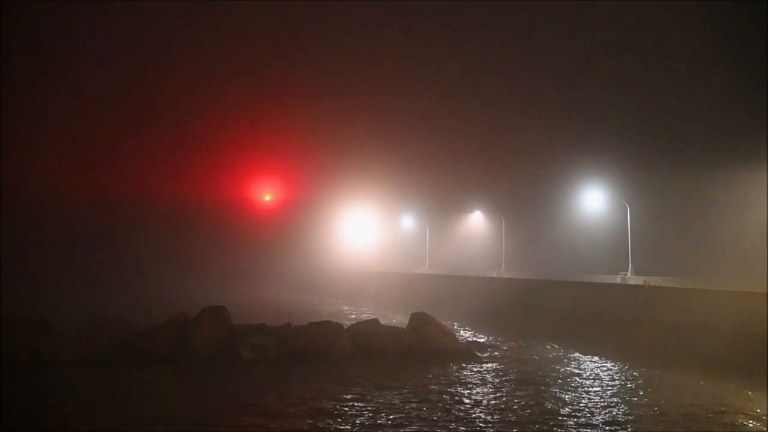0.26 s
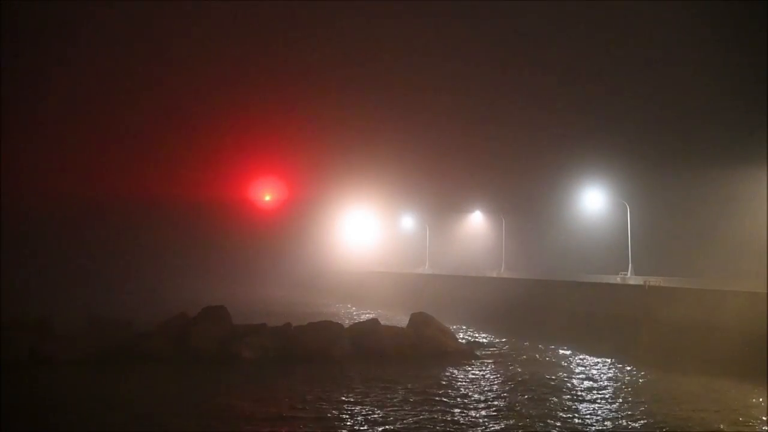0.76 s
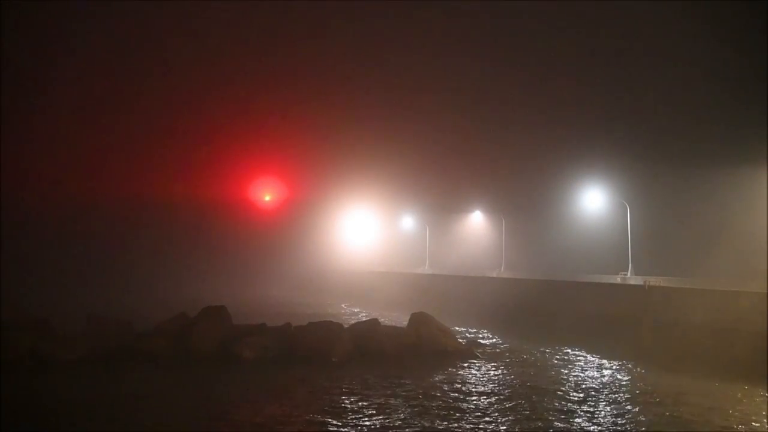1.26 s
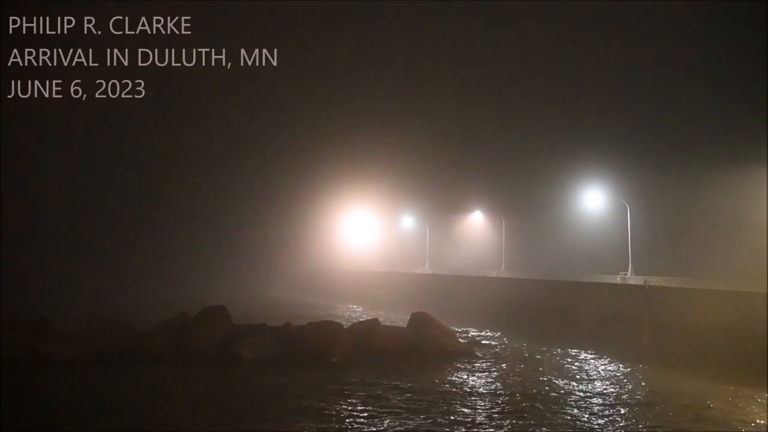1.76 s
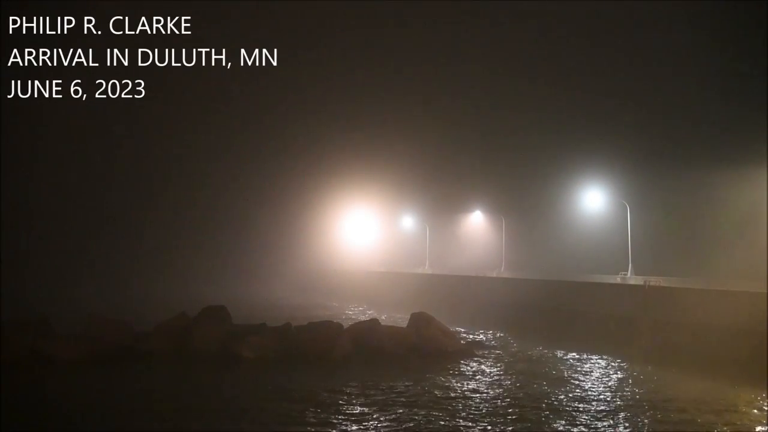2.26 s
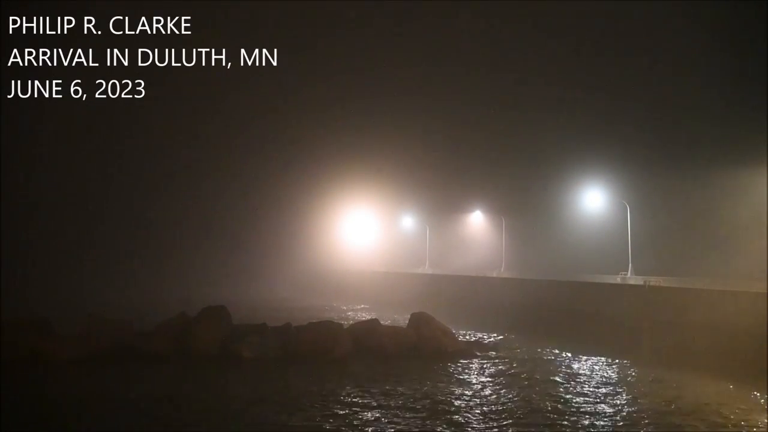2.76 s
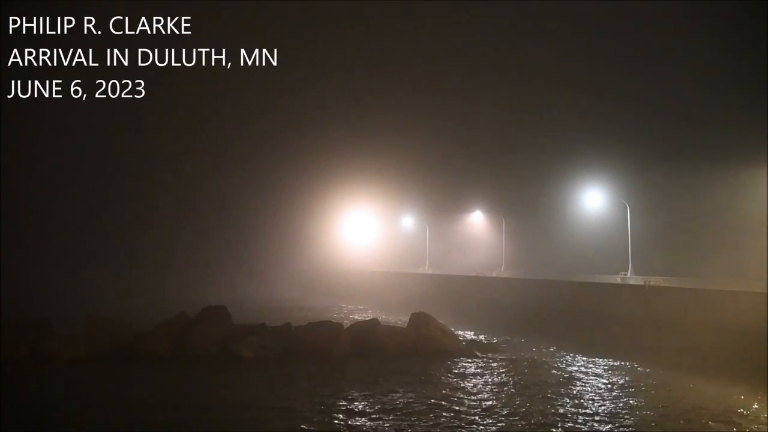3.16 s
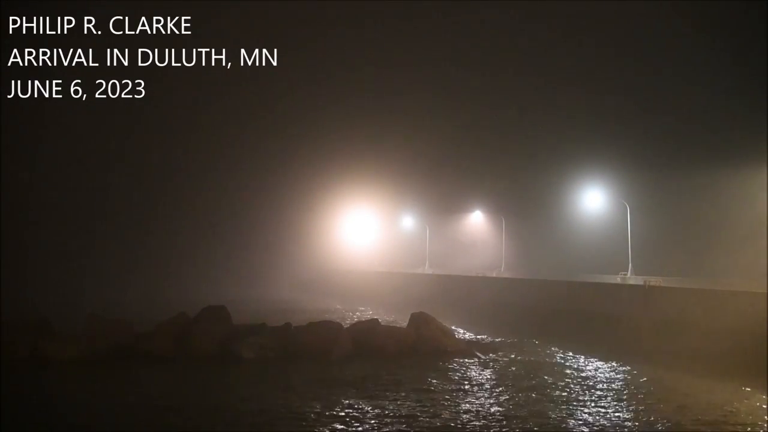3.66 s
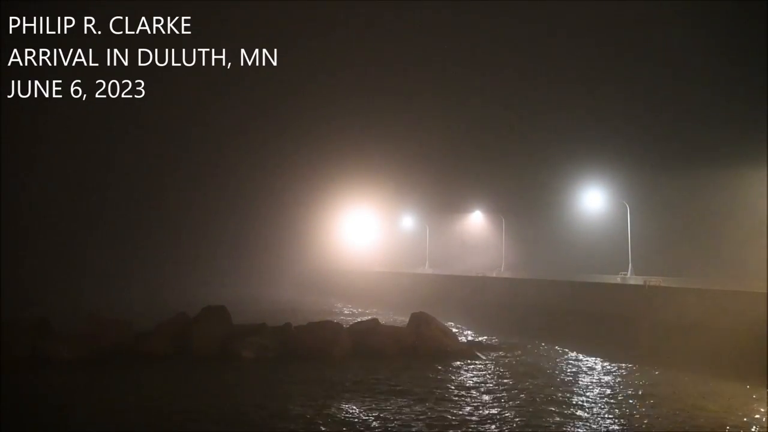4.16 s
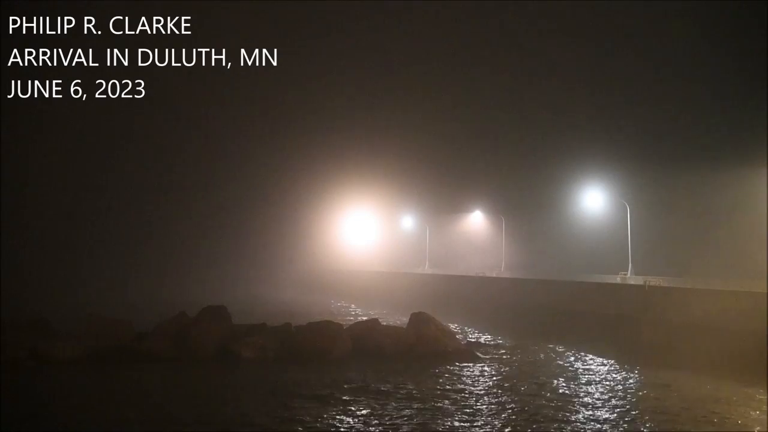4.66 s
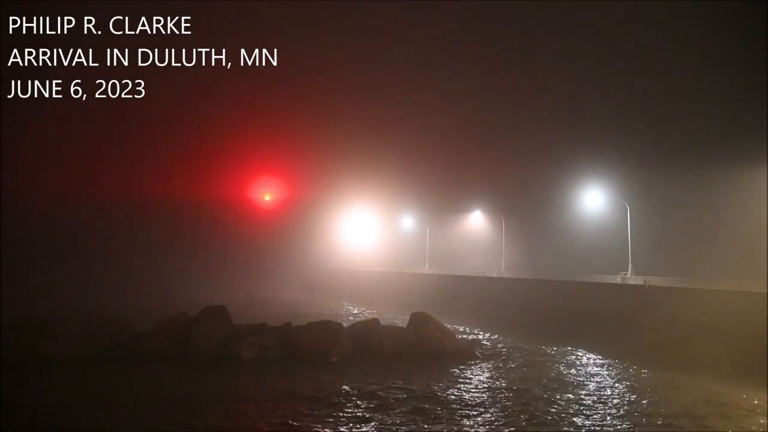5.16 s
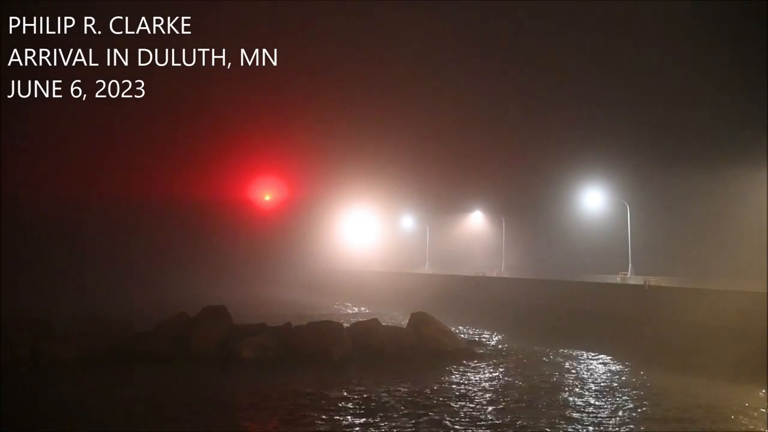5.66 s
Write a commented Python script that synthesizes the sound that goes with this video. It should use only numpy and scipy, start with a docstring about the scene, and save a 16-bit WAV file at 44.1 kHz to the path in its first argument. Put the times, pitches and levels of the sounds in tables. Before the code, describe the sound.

Quiet water laps, gurgles and fizzes over rocks, slowly swelling, until a loud low ship's horn bursts in near the end and holds.

```python
"""At a harbour wall in fog, water washes over a rock jetty and a large ship sounds a low air horn.
Filtered noise gives the surge, the wash and the hiss of foam and spray; decaying sine bubbles give
gurgles, ticks, drops and the repeated slaps on stone. The water swells, and near 5 s the horn
enters over it: a sum of harmonics with the phases of a ringing bell, each wavering, with faint
scatter behind. The horn lasts to the end."""
import sys
import numpy as np
from scipy import signal
from scipy.fft import rfft, irfft, next_fast_len
from scipy.io import wavfile
from scipy.ndimage import uniform_filter1d

SR = 44100
rng = np.random.default_rng(int(sys.argv[2]) if len(sys.argv) > 2 else 0)


def persist_wave(psi):
    """Save psi, clipped to +-1, as 16-bit WAV."""
    counts = np.round(np.clip(psi, -1, 1) * 32767).astype(np.int16)
    wavfile.write(sys.argv[1], SR, np.atleast_2d(counts).T)


N = 261072
TIME = np.arange(N) / SR  # s

# Low surge of the swell: time_s, level_db
SURGE_LEVEL = [(0.0, -73), (1.48, -67), (1.59, -65), (1.66, -69), (3.19, -64), (3.26, -60.5), (3.41, -62),
               (4.94, -57), (5.0, -59)]
# Water running over the rocks, before trim and lapping: time_s, level_db
WASH_LEVEL = [(0.0, -67), (0.15, -63), (0.42, -59.5), (1.25, -61.5), (1.48, -57.5), (1.67, -61.5),
              (1.89, -62), (3.05, -58), (3.52, -55.5), (4.68, -52.5), (5.0, -49.5), (5.9, -48.5)]
# Fizz of the foam, before each layer's trim: time_s, level_db
FOAM_LEVEL = [(0.0, -76.5), (0.36, -72), (0.76, -78), (1.45, -73.5), (1.6, -69.5), (1.73, -75),
              (1.89, -77.5), (2.82, -74), (3.56, -64), (4.42, -67), (4.88, -65.5), (5.61, -65), (5.79, -68),
              (5.92, -69.5)]
# Relative spectral densities of the four noise layers: frequency_hz, density_db (per Hz)
SURGE_SPECTRUM = [(10, -17), (25, -8), (45, -5), (65, -3), (100, -0.5), (125, -1.5), (152, 3.5), (185, 0),
                  (270, 1.5), (380, 1.5), (500, -1), (800, -34.5)]
WASH_SPECTRUM = [(150, -37.5), (270, -14), (400, -5.5), (600, 0), (850, -0.85), (1200, -3), (1600, -6),
                 (2100, -11), (2700, -16.5), (3400, -17), (5000, -27), (9000, -54)]
FOAM_SPECTRUM = [(700, -7), (1800, 8.5), (3200, 4), (4200, 2), (5500, 0), (7000, -2.5), (8600, -3.5),
                 (9200, -34), (11000, -34), (15500, -47)]
SPRAY_SPECTRUM = [(5000, -10), (8500, 3), (10000, -2), (12500, -5), (14000, -7), (15500, -10)]
# Slaps of water on stone, levels before trim: start_s, peak_db, centre_hz, length_s, thrown_foam_db
SLAP_EVENTS = [(.27, -47.5, 1000, .08, -77), (.828, -47, 800, 0.029, -72), (1.025, -48.5, 806, 0.015, -68),
               (1.095, -59, 2500, .012, -69), (1.2, -49, 654, 0.034, -80),
               (1.264, -48.5, 2900, 0.0074, -74), (1.435, -49, 2000, 0.007, -60),
               (1.475, -45, 1400, 0.011, -60), (1.511, -42.5, 2000, 0.014, -60.5),
               (1.559, -44.5, 766, .03, -69), (1.624, -42.5, 1800, .01, -61),
               (1.667, -43.5, 1790, .016, -60), (1.689, -41.5, 3100, .006, -63),
               (1.916, -50, 2500, .011, -72), (2.36, -50, 1410, 0.033, -77), (2.46, -49, 650, 0.057, -80),
               (3.005, -46, 1400, .019, -71), (3.244, -44.5, 1050, .042, -65),
               (3.49, -43.5, 2300, 0.0066, -71), (3.55, -44, 1250, .08, -76),
               (3.959, -41.5, 850, 0.021, -63), (4.08, -42, 2000, 0.024, -64),
               (4.332, -42.5, 650, 0.04, -64), (4.769, -40, 950, 0.042, -73),
               (5.012, -40, 2531, 0.0097, -73), (5.388, -39.5, 3600, 0.01, -57),
               (5.593, -36, 680, .018, -75)]
# Single bubbles: start_s, level_db, initial_pitch_hz, ring_time_s (to -60 dB)
SINGLE_BUBBLES = [(1.033, -47, 800, .025), (1.4485, -36, 850, .018), (1.4535, -38, 850, .018),
                  (1.755, -50, 6500, .002), (1.828, -59, 10000, .0015), (4.265, -53, 8000, .005),
                  (4.957, -43, 2100, .008), (4.961, -42, 4700, .005)]
# Horn partials at full drive, relative levels: harmonic_number, level_db
HORN_PARTIALS = [(1, -6), (2, -5), (3, -2), (4, 0), (5, 0), (6, -10), (7, -17), (8, -3), (9, -4), (10, -15),
                 (11, -17), (12, -24), (13, -25), (14, -12), (15, -9), (16, -10), (17, -13), (18, -18),
                 (19, -19), (20, -14), (21, -17), (22, -24), (23, -22), (24, -20), (25, -23), (26, -23),
                 (27, -30), (28, -35), (29, -37), (30, -34), (31, -37), (32, -32), (33, -36), (34, -34),
                 (35, -37), (36, -38), (37, -39)]
# Close reflections that smear each horn pulse, as all-pass sections: delay_s, share (ratio)
PULSE_SMEAR = [(.000495, -.66), (.00147, .33)]

SETTLE_S = .023  # time constant with which the gain of thrown foam dies away
HORN_DB = -30  # rms at full drive
FIRST_PULSE_S, BLAST_S, ATTACK_S = 5.0226, 5.026, .053
# drive when the valve has just opened, and its slow sag; both grow with a partial's frequency
CRACKED_DB, SAG_DB_PER_S = -24, .4
PITCH_HZ, CREEP_HZ_PER_S = 94.75, .14  # the note creeps upward
EDGE_HZ = 15680  # upper band limit of the recorder


def amp(db):
    """A level in decibels corresponds to an amplitude ratio of 10^(dB/20)."""
    return 10 ** (np.asarray(db) / 20)


def unit(x):
    """Dividing by the root mean square sets the rms to 1."""
    return x / np.sqrt(np.mean(x ** 2) + 1e-20)


def read(points, hz):
    """A spectrum is interpolated linearly in dB against log frequency."""
    point_hz, value = np.transpose(points)
    return np.interp(np.log(hz + 1), np.log(point_hz + 1), value)


def follow(rows, column=1):
    """A control curve is interpolated linearly in time, at every sample."""
    rows = np.asarray(rows)
    return np.interp(TIME, rows[:, 0], rows[:, column])


def add(mix, start_s, sound):
    """Superposition: a sound is summed in place from its start, cut at the end of the mix."""
    part = mix[round(start_s * SR):][:len(sound)]
    part += sound[:len(part)]


def colour(x, points):
    """Linear filtering: a gain at each frequency shapes the spectrum, at rms 1."""
    gain = amp(read(points, np.fft.rfftfreq(N, 1 / SR)))
    return unit(irfft(rfft(x) * gain, N))


def drift(rate_hz):
    """Low-pass filtered noise: a random fluctuation slower than about rate_hz, at rms 1."""
    size = next_fast_len(N)
    hz = np.fft.rfftfreq(size, 1 / SR)
    spectrum = rfft(rng.standard_normal(size)) / (1 + (hz / rate_hz) ** 4)
    return unit(irfft(spectrum, size)[:N])


def bubble(hz, t60):
    """Damped resonance: a pocket of air rings and dies, rising in pitch as it nears the surface."""
    t = np.arange(int(t60 * SR) + 8) / SR
    decay = amp(-60 * t / t60)
    onset = 1 - np.exp(-4 * hz * t)
    return decay * onset * np.sin(2 * np.pi * hz * t * (1 + .1 * t / t60))


def bubbling(low_hz, high_hz, per_s, spread_db, cycles, count=36):
    """Random superposition: a crowd of bubbles of many pitches, most small and a few large."""
    out = np.zeros(N)
    for hz in np.geomspace(low_hz, high_hz, count):
        sizes = amp(spread_db * np.minimum(rng.exponential(1, N), 4))
        sizes *= rng.random(N) < per_s / count / SR  # chance of a bubble at each sample
        out += signal.oaconvolve(sizes, hz * bubble(hz, cycles / hz))[:N]
    return unit(out)


def churn(patchy_db):
    """Modulated noise: the hiss of countless tiny bubbles, in patches of time and frequency."""
    spectrum = signal.stft(rng.standard_normal(N), nperseg=512)[2]
    patches = rng.standard_normal(spectrum.shape)
    for axis in (0, 1):
        patches = uniform_filter1d(patches, size=7, axis=axis)
    hiss = signal.istft(spectrum * amp(patchy_db * unit(patches)), nperseg=512)[1]
    return unit(hiss[:N])


def rumble():
    """Broadband flow noise: the low surge of the swell is filtered noise of varying level."""
    return amp(follow(SURGE_LEVEL)) * colour(rng.standard_normal(N), SURGE_SPECTRUM)


def wash(trim_db=1.0, gurgle=0.28, lap_db=0.86, lap_hz=5):
    """Entrained air: water over rocks hisses with tiny bubbles and gurgles with larger ones."""
    gurgles = bubbling(307.0, 3660, per_s=700, spread_db=0.5, cycles=18.6)
    level = amp(follow(WASH_LEVEL) + trim_db + lap_db * drift(lap_hz))
    return level * colour(churn(patchy_db=-1.4) + gurgle * gurgles, WASH_SPECTRUM)


def thrown():
    """Growth and decay: foam thrown up grows while a slap lasts, then settles; powers add."""
    t = np.arange(SR // 3) / SR
    power = np.zeros(N)
    for start_s, _, _, length_s, fizz_db in SLAP_EVENTS:
        envelope = np.minimum(t / length_s, np.exp((length_s - t) / SETTLE_S))
        add(power, start_s, (amp(fizz_db) * envelope) ** 2)
    return np.sqrt(power)


def foam(trim_db=4, thrown_db=2, crackle=0.36):
    """Bursting films: foam fizzes as noise and ticks as short bubble rings."""
    level = np.hypot(amp(follow(FOAM_LEVEL) + trim_db), amp(thrown_db) * thrown())
    ticks = bubbling(2100, 8800, per_s=1500, spread_db=4.0, cycles=17)
    return level * colour(churn(patchy_db=2.1) + crackle * ticks, FOAM_SPECTRUM)


def spray(trim_db=-7.5, thrown_db=-16.5, patter=0.55, flicker_db=0.7, flicker_hz=12,
          crest_s=3.9, thinning_db_per_s=2.0):
    """Droplet impact: the finest drops fall back with the foam, thinning once the wave has crested."""
    thinning_db = thinning_db_per_s * np.maximum(TIME - crest_s, 0)
    level_db = follow(FOAM_LEVEL) + trim_db - thinning_db + flicker_db * drift(flicker_hz)
    level = np.hypot(amp(level_db), amp(thrown_db) * thrown())
    drops = bubbling(7300, 15000, per_s=830, spread_db=2.5, cycles=15)
    return level * colour(churn(patchy_db=-2.5) + patter * drops, SPRAY_SPECTRUM)


def slaps(trim_db=-1, spread=0.587, cycles=7, top_hz=6500, count=40):
    """Impact and entrainment: each slap bursts into a brief cloud of bubbles around its own pitch."""
    out = np.zeros(N)
    for start_s, peak_db, centre_hz, length_s, _ in SLAP_EVENTS:
        cloud = np.zeros(SR // 4)
        for when, offset in zip(rng.random(count), rng.standard_normal(count)):
            hz = np.clip(centre_hz * np.exp(spread * offset), 280, 14000)
            # late bubbles and the very smallest are weaker
            size = np.exp(-when) / (1 + (hz / top_hz) ** 4)
            add(cloud, 2 * length_s * when, size * bubble(hz, cycles / hz))
        add(out, start_s, amp(peak_db + trim_db) * cloud / abs(cloud).max())
    for start_s, level_db, hz, ring_s in SINGLE_BUBBLES:
        add(out, start_s, amp(level_db) * bubble(hz, ring_s))
    return out


def harbour(x, t60=1.1, dull_hz=1800):
    """Diffuse reflection: scatter from wall and waves is a decaying, dulled noise response."""
    t = np.arange(SR) / SR
    tail = rng.standard_normal(SR) * amp(-60 * t / t60) * (t > .03)
    tail = signal.lfilter(*signal.butter(1, dull_hz, fs=SR), tail)
    return signal.oaconvolve(x, tail / np.linalg.norm(tail))[:N]


def bell_phase(hz, level_db):
    """Minimum phase: the bell answers causally, so its phase follows from its gain."""
    grid_hz = np.fft.fftfreq(SR, 1 / SR)  # 1 Hz steps
    curve_hz = np.r_[0, hz, 6000]
    curve_db = np.r_[level_db[0] - 17, level_db, level_db[-1] - 18]
    bell_db = np.interp(abs(grid_hz), curve_hz, curve_db)
    phase = -signal.hilbert(np.log(amp(bell_db))).imag[hz.astype(int)]
    # all-pass sections shift phase and leave the levels alone
    for delay_s, share in PULSE_SMEAR:
        echo = np.exp(-2j * np.pi * hz * delay_s)
        phase += np.angle((share + echo) / (1 + share * echo))
    return phase


def horn(brighten_hz=190, shimmer_hz=16, sway=1.2, sway_hz=2.7, air_db=-29.0):
    """Pulsed flow and resonance: a diaphragm chops compressed air; the flared bell rings each pulse."""
    order, level_db = np.transpose(HORN_PARTIALS)
    age = np.maximum(TIME - BLAST_S, 0)
    # the valve opens, the air drive climbs to full and sags slowly throughout
    drive_db = CRACKED_DB * np.maximum(1 - age / ATTACK_S, 0) - SAG_DB_PER_S * age
    pitch_hz = PITCH_HZ + CREEP_HZ_PER_S * age
    turns = np.cumsum(pitch_hz) / SR
    turns -= np.interp(FIRST_PULSE_S, TIME, turns)  # phase zero at the first pulse
    partial_hz = order * pitch_hz[-1]
    phase = bell_phase(partial_hz, level_db)
    tone = np.zeros(N)
    for k, hz, partial_db, angle in zip(order, partial_hz, level_db, phase):
        # moving air makes each partial waver in level and phase, the high ones more
        waver_db = .38 * (hz / 500) ** .2
        wander = np.log(amp(waver_db)) * drift(shimmer_hz)
        level_waver_db = waver_db * (drift(shimmer_hz) + sway * drift(sway_hz))
        # high partials need more drive, so they speak last
        gain = amp(partial_db + drive_db * np.sqrt(hz / brighten_hz) + level_waver_db)
        tone += gain * np.cos(2 * np.pi * k * turns + angle + wander)
    # turbulence in the air jet roughens every pulse
    tone *= 1 + amp(air_db) * drift(700)
    full_drive_rms = np.sqrt(np.sum(amp(level_db) ** 2) / 2)
    return amp(HORN_DB) * tone * (TIME > FIRST_PULSE_S) / full_drive_rms


def scene():
    """Superposition: the water layers, the horn and its faint scatter add linearly."""
    water = rumble() + wash() + foam() + spray() + slaps()
    blast = horn()
    scatter = amp(-31) * harbour(blast)
    return (water + scatter + blast)[None]


def record(dry):
    """Band limitation: a linear-phase low-pass, after a short fade for a click-free end."""
    fade = np.minimum((TIME[-1] - TIME) / .003, 1)
    low_pass = signal.firwin(511, EDGE_HZ, window=("kaiser", 9), fs=SR)
    return signal.oaconvolve(dry * fade, low_pass[None], "same")


dry = scene()
out = record(dry)
persist_wave(out)
```